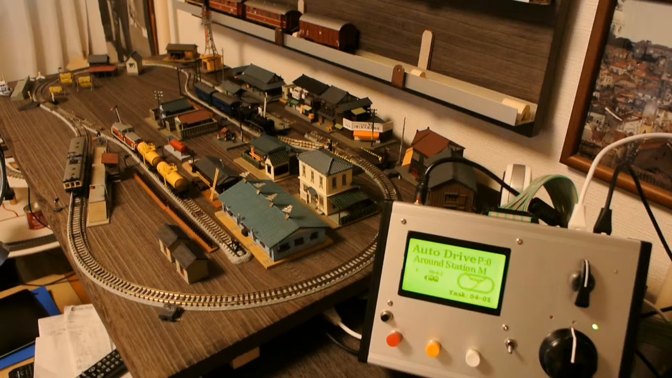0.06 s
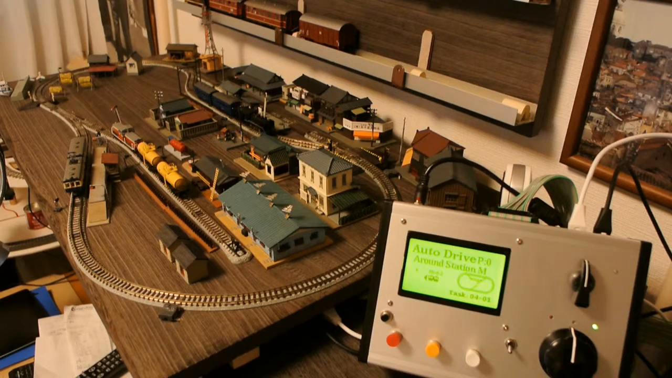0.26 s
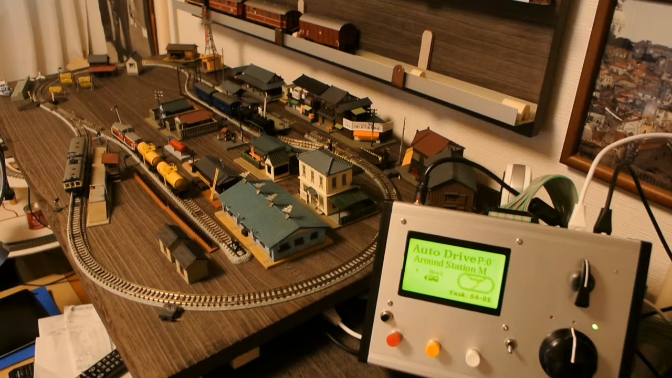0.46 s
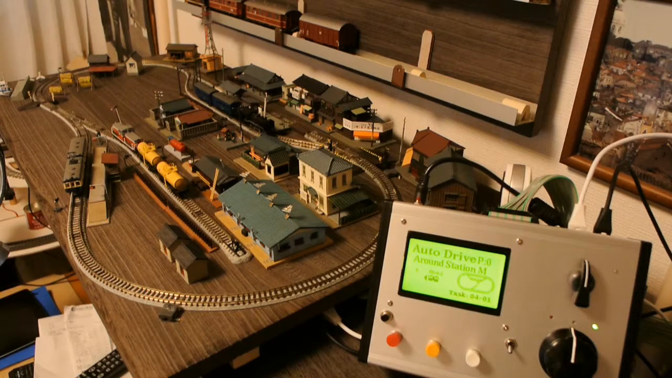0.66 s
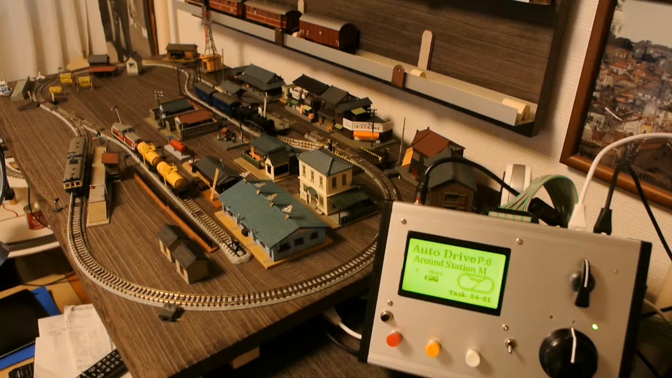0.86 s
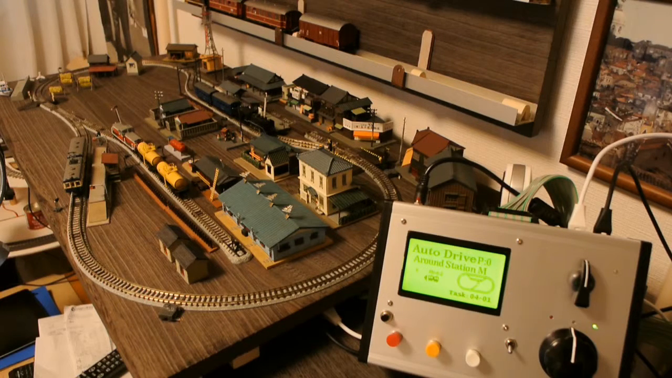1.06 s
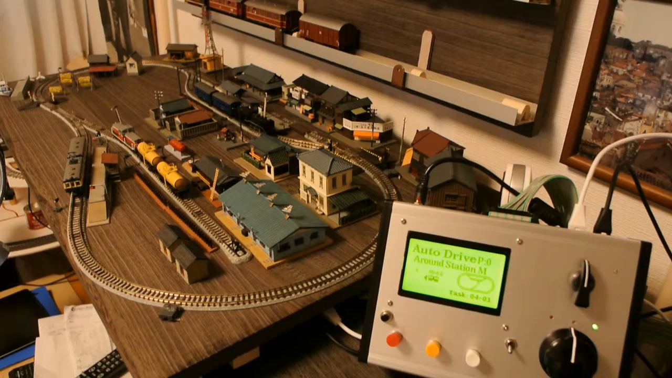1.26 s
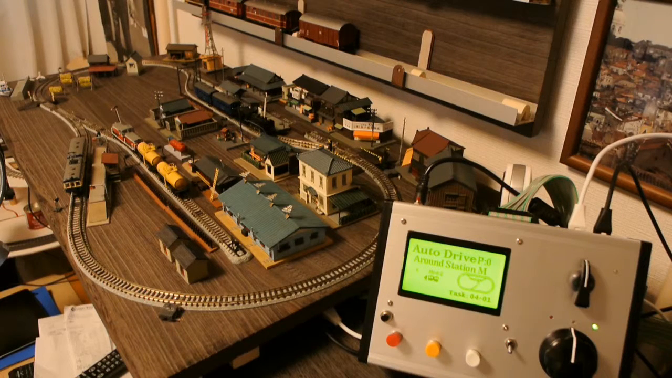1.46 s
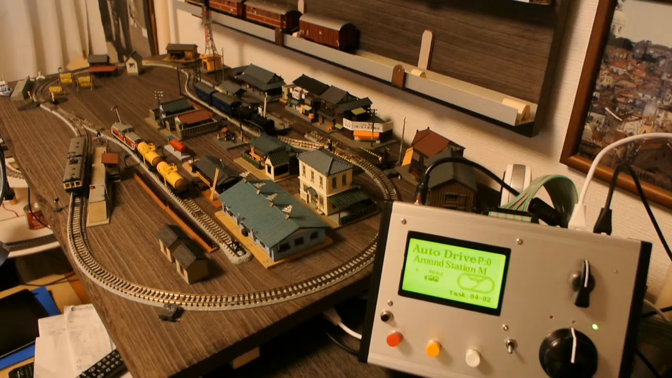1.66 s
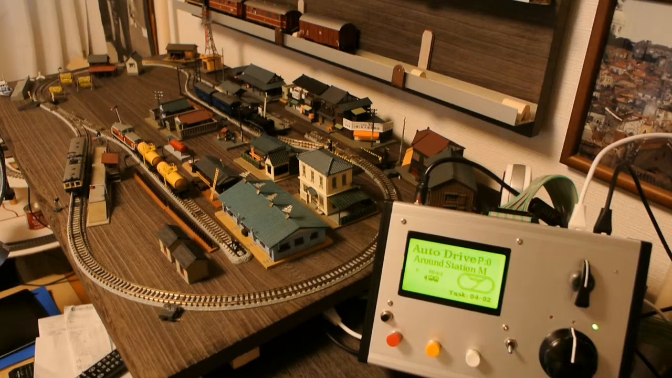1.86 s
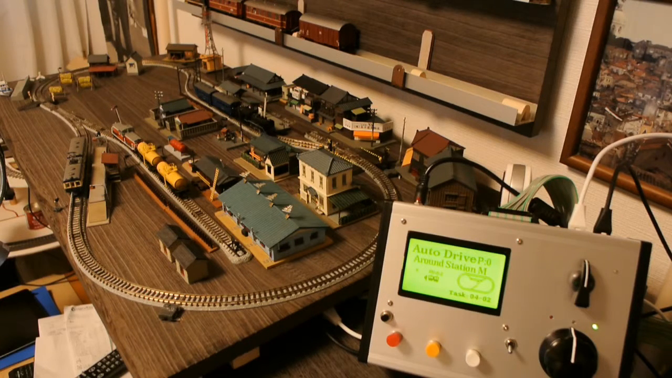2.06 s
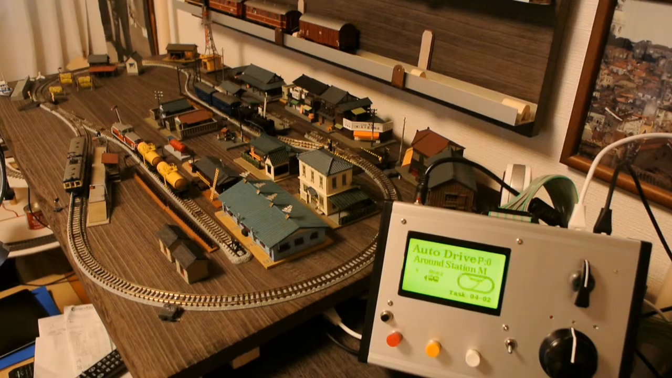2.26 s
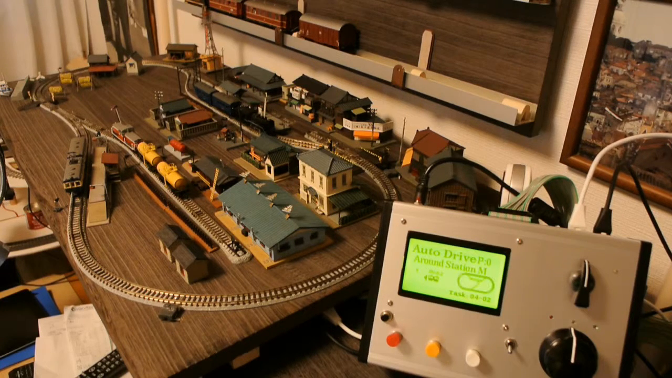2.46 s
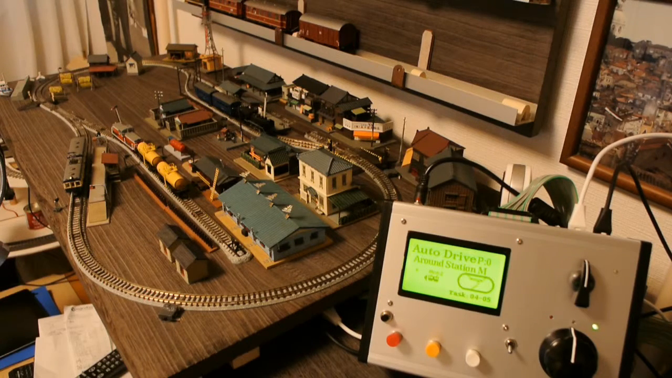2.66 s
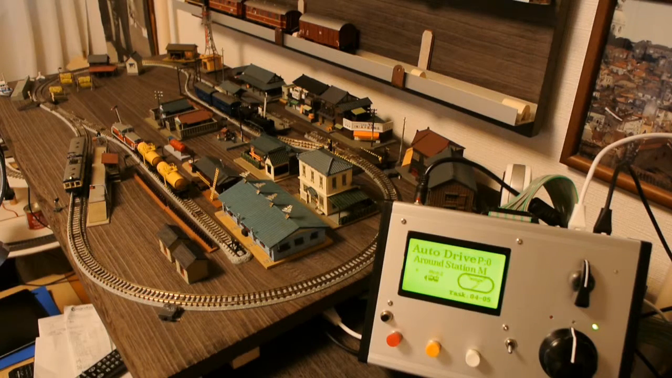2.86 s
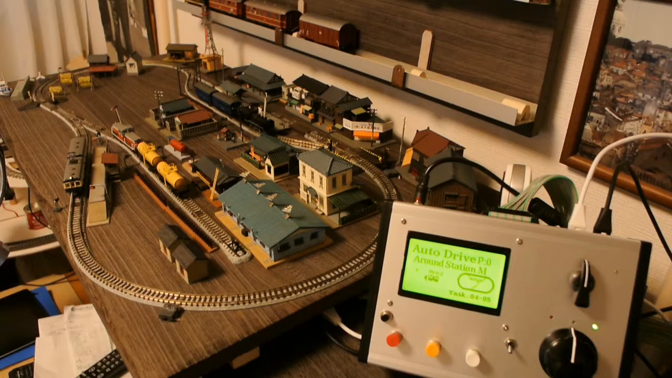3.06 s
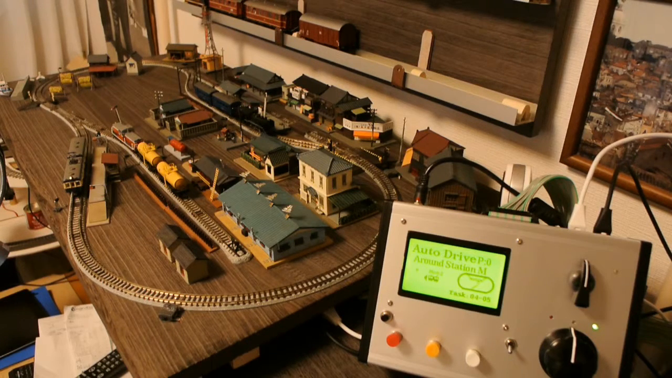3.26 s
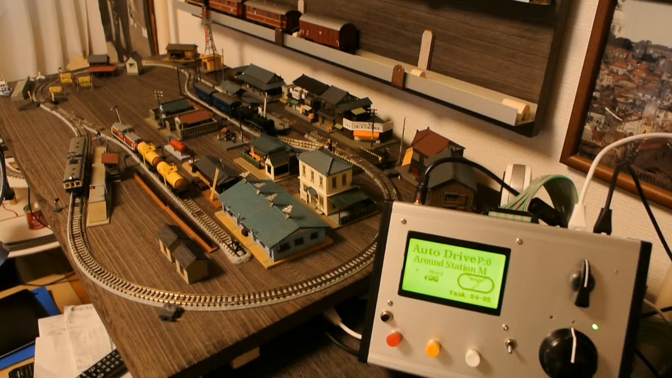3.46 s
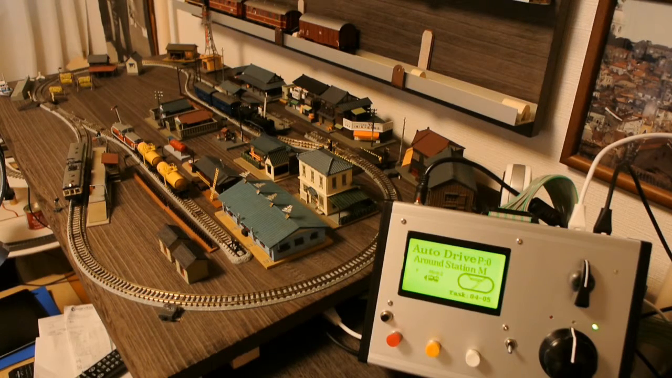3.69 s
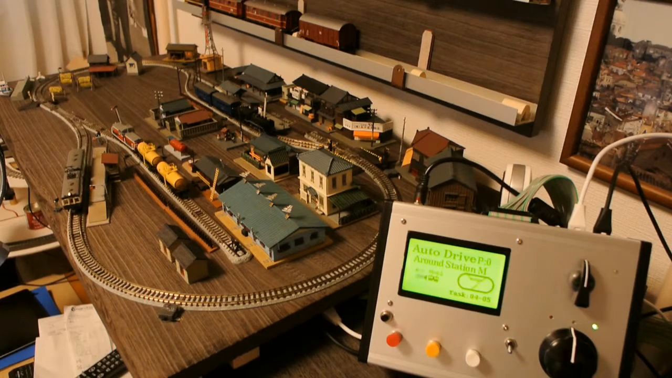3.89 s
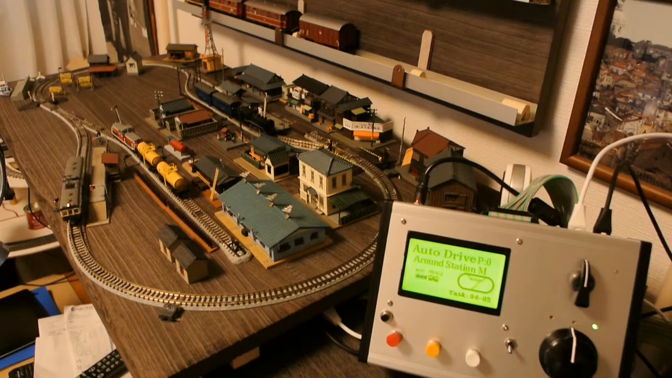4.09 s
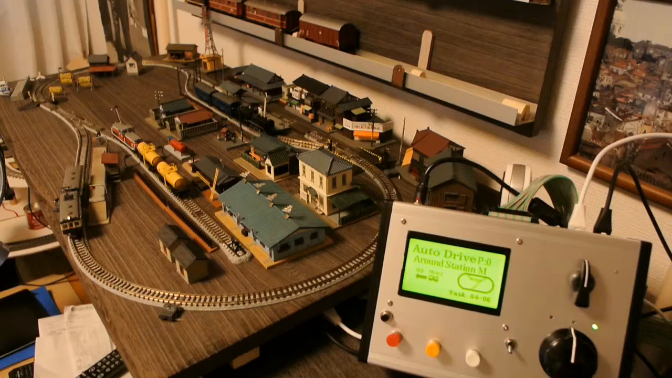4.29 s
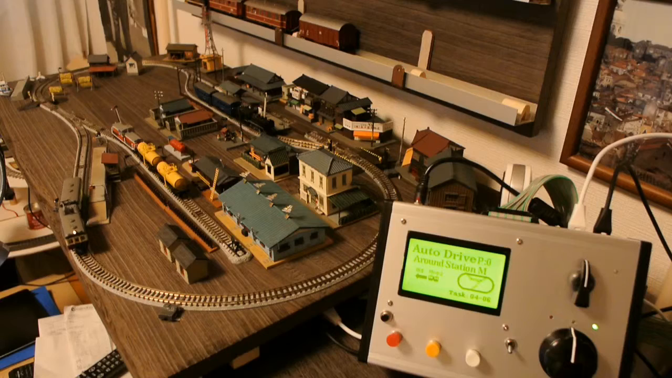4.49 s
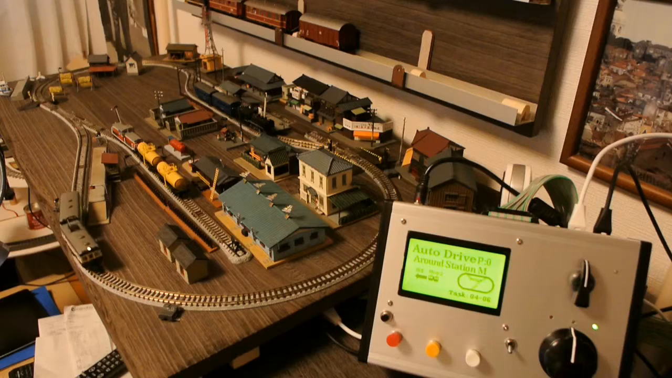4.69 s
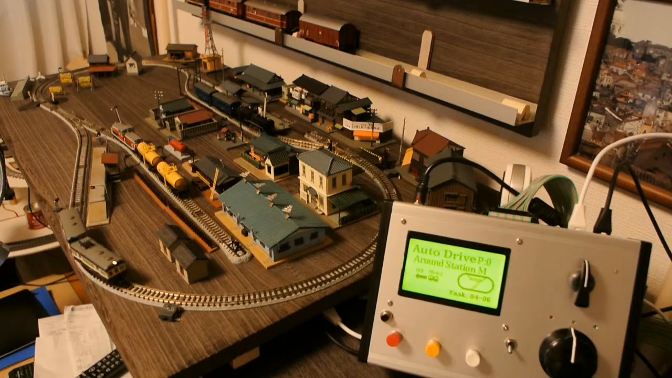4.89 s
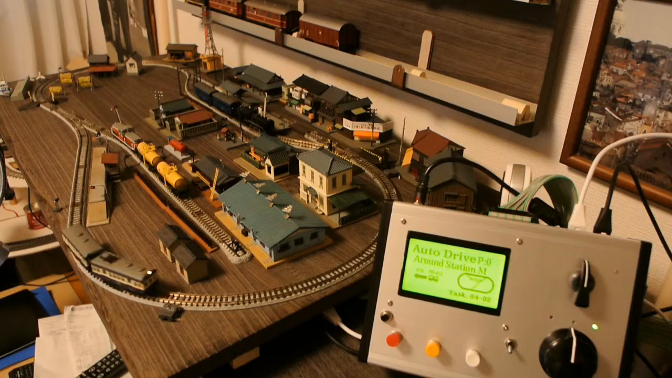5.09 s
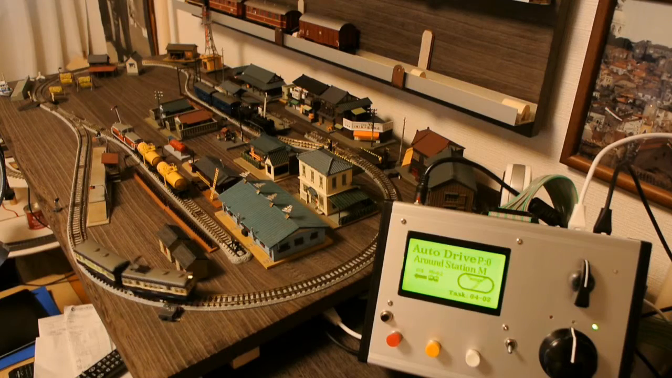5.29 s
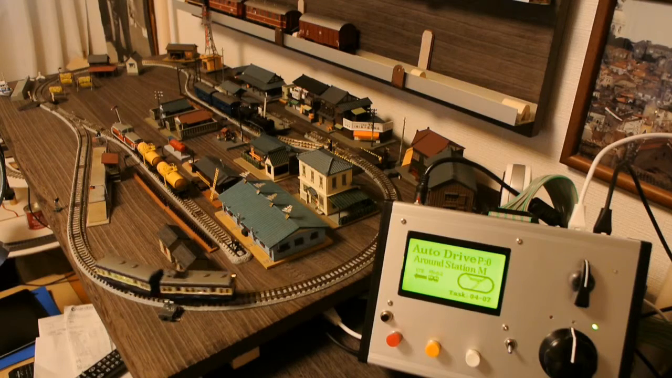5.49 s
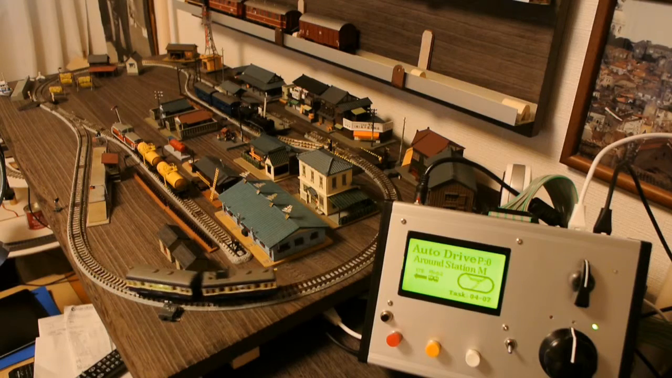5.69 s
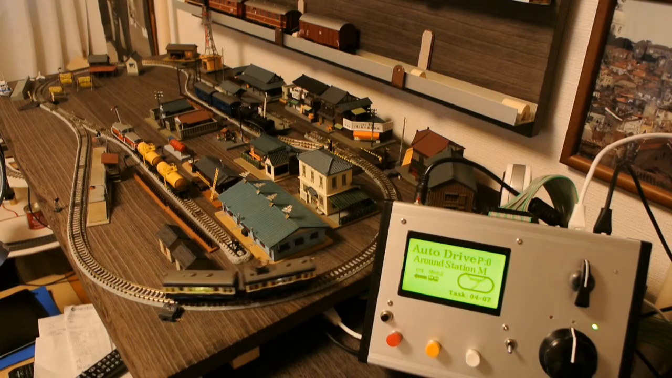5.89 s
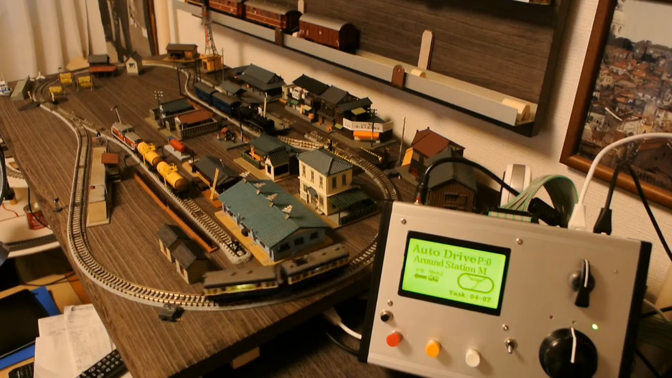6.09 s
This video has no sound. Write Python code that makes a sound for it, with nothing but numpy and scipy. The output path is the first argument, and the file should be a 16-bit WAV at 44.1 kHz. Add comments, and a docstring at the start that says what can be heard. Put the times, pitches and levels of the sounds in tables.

```python
"""A small, quiet room with a model railway on a wooden table.
Three solenoid point switches snap over half a second apart; each impact excites the baseboard's modes.
Then a two-car electric train pulls away and rounds the near curve. Its drive whirrs, its wheels hiss
and click over the rail joints, and all of this passes through the resonances of car bodies and track.
Beneath lie a steady hiss and a few faint knocks."""
import sys
import numpy as np
from scipy import signal
from scipy.fft import rfft, irfft
from scipy.io import wavfile

SR = 44100
rng = np.random.default_rng(int(sys.argv[2]) if len(sys.argv) > 2 else 0)


def unload_audio(sound):
    """Save the sound as a 16-bit wav file, at the path given as the first command line argument."""
    columns = np.transpose(np.atleast_2d(sound))
    # keep every value between -1 and 1, then stretch to whole-number steps
    steps = np.round(np.clip(columns, -1, 1) * 32767)
    wavfile.write(sys.argv[1], SR, steps.astype(np.int16))


N = 270774

DEPART_S, SPEED_UP_S = 3.531, 1.21
BITE_S, BITE_WIDTH_S, BITE_DB = 4.77, 0.15, 2  # the flanges bite on entering the curve
def train():
    """Source and filter: contact noise grows as a power of speed and excites the cars and track."""
    t = np.arange(N) / SR
    speed = np.clip((t - DEPART_S) / SPEED_UP_S, 0, 1)
    bite = from_db(BITE_DB * np.exp(-((t - BITE_S) / BITE_WIDTH_S) ** 2))
    rail_force = speed ** 1.17 * bite
    contact = drive_whirr(speed) + wheel_hiss(rail_force) + clicks(rail_force)
    balance = from_db([[0.28], [-0.28]])  # slightly to the left
    return room(body_resonances(contact, t), wet_db=-9) * balance


# Spectrum of motor and gears: f/Hz, relative level/dB
DRIVE_SPECTRUM = [(60, -39), (140, -31), (200, -10), (350, -13), (540, -12), (680, -6), (1000, -5),
                  (1400, 0), (1800, 0), (2300, -2.5), (3500, -5), (8000, -14.5), (16000, -46)]
def drive_whirr(speed):
    """Gear noise: its amplitude grows roughly as the square root of speed."""
    force = from_db(-40) * speed ** 0.52 * contact_noise(grain_db=0, sway_db=0.5)
    return colour(force, DRIVE_SPECTRUM)


# Spectrum of wheels on rails: f/Hz, relative level/dB
WHEEL_SPECTRUM = [(200, -39), (1200, -15), (2500, -6.5), (3900, -4), (5000, -0.5), (6400, 2.5), (8000, 0.5),
                  (10000, -3), (13000, -5.5), (16000, -8)]
def wheel_hiss(rail_force):
    """Rolling noise: its amplitude is proportional to the force on the rail."""
    force = from_db(-32.5) * rail_force * contact_noise(grain_db=1, sway_db=0.5)
    return colour(force, WHEEL_SPECTRUM)


# Spectrum of a click: f/Hz, relative level/dB
CLICK_SPECTRUM = [(150, -24), (700, -11.5), (1600, -1.5), (2500, -3), (3500, -3.5), (5500, 2.5), (7500, 1),
                  (10000, 0.5), (16000, -2)]
def clicks(rail_force, size=16384):
    """Impact noise: jolts from joints and loose parts each release a broadband burst."""
    jolts = joint_jolts() + from_db(-25) * rail_force * rattle(per_s=55, t60=0.012)
    add(jolts, DEPART_S, from_db(-32) * blow(size, t60=0.27, rise=0.0013))  # the couplings jerk
    return colour(jolts * contact_noise(grain_db=1.5, sway_db=0), CLICK_SPECTRUM)


# Rail joint crossings: t/s, level/dB, wheel-to-wheel interval/s, number of wheels
JOINT_CROSSINGS = [(3.572, -35.5, 0, 1), (3.709, -29, 0.019, 2), (3.857, -25, 0, 1), (4.019, -39, 0, 1),
                   (4.069, -24.5, 0.014, 2), (4.173, -25, .0155, 2), (4.281, -24.5, 0, 1),
                   (4.376, -22, 0.013, 2), (4.545, -22.5, 0.038, 4), (4.706, -21.5, .035, 4),
                   (4.941, -22.5, 0.074, 4), (5.450, -25, 0, 1), (5.581, -21.5, 0.078, 4),
                   (5.967, -23.5, 0.079, 4)]
def joint_jolts(size=8192):
    """Impulsive excitation: each wheel in turn drops into the joint, and its chatter dies away."""
    force = np.zeros(N)
    for start, level_db, gap, wheels in JOINT_CROSSINGS:
        for k in range(round(wheels)):
            add(force, start + k * gap, from_db(level_db) * blow(size, t60=0.07, rise=0.0007))
    return force


def rattle(per_s, t60):
    """Poisson process: loose couplings and bogies give decaying jolts of uneven height."""
    ticks = (rng.random(N) < per_s / SR) * rng.random(N)
    decay = from_db(-60 / (t60 * SR))
    return signal.lfilter([1], [1, -decay], ticks + 1e-18)


# Passage from the straight into the curve: t/s, share of curve (0-1)
CURVE_SHARE = [(4.4, 0), (4.7, 0.63), (5.3, 1), (5.8, 0.8)]
# Modes of car bodies and track bed: f/Hz, bandwidth/Hz, gain on straight/dB, gain in curve/dB
BODY_MODES = [(356, 22, -7, 4), (690, 72, -21, -22), (920, 150, -27, -1.5), (1196, 39, -5, -4.5),
              (1413, 74, -3, -33), (1460, 12, -12, -15), (1644, 38, -1.5, -1.5), (1727, 39, 1, 0),
              (1986, 21, -20, 3), (3110, 130, -3.5, -2.5), (4400, 630, -24, -10), (5180, 310, -0.5, -24),
              (6470, 33, -15, 2), (12800, 700, -28, -9)]
def body_resonances(contact, t):
    """Forced vibration: other modes take over in the curve, where flanges press on the outer rail."""
    bend = np.interp(t, *np.transpose(CURVE_SHARE))
    sound = contact
    for hz, width, straight_db, curve_db in BODY_MODES:
        gain = (1 - bend) * from_db(straight_db) + bend * from_db(curve_db)
        sound = sound + gain * resonance(contact, hz, width)
    return sound


def contact_noise(grain_db, sway_db):
    """Amplitude modulation: tiny impacts roughen a noise whose force sways as the wheels turn."""
    grains = rms_one(from_db(grain_db * flutter(per_s=1500)))
    return stereo_noise(LAYOUT_COHERENCE) * grains * from_db(sway_db * flutter(per_s=90))


# Throws of the point switches: t/s, snap level/dB, snap T60/s
SWITCH_THROWS = [(1.138, -18, 0.041), (1.6375, -19.5, 0.068), (2.1375, -15.5, 0.024)]
# Spectra of the plungers: f/Hz, relative level/dB for switch 1, 2, 3
SNAP_SPECTRA = [(100, -27, -18, -23), (280, -13, -9, -12), (597, -2, 5, 0), (895, 4, -1.5, -8),
                (1400, -2, -1, -1), (2180, -8, -3.5, -7.5), (2700, -3.5, 1, 9), (3570, -2, 1, -3.5),
                (4360, 2, -3, -0.5), (7040, -5.5, 3, 0), (8700, 0.5, 0.5, -2), (11500, -1.5, 0.5, 2.5),
                (14500, -2, 2, -2), (16000, -6, -5, -7)]
def switches(size=16384, slide_s=0.003):
    """Impact excitation: each solenoid plunger slides, slams home and sets the board ringing."""
    out = np.zeros((2, N))
    for k, (start, level_db, snap_t60) in enumerate(SWITCH_THROWS):
        force = from_db(-15.5) * blow(size, t60=0.037, rise=0.0033)  # slide
        add(force, slide_s, blow(size, snap_t60, rise=0.00039))  # slam
        spectrum = np.array(SNAP_SPECTRA)[:, [0, k + 1]]
        snap = colour(force * stereo_noise(LAYOUT_COHERENCE, size), spectrum)
        add(out, start - slide_s, from_db(level_db) * room(snap, wet_db=-5.5))
        add(out, start, baseboard(k, size))
    return out


# Modes of baseboard and switch housings: f/Hz, T60/s, level/dB for switch 1, 2, 3
BASEBOARD_MODES = [(306, 0.11, -69, -55, -43), (440, 0.16, -52, -35, -34), (480, 0.16, -47, -26.5, -29),
                   (733, .12, -38, -35, -39), (800, 0.2, -38.5, -43, -37), (874, 0.15, -40, -36.5, -60),
                   (1020, 0.21, -41, -57, -47), (1233, 0.33, -51, -46, -57), (1440, 0.078, -36, -27.5, -30),
                   (1474, 0.1, -32.5, -32, -33), (2754, 0.065, -33, -32, -37.5),
                   (3190, 0.16, -40, -48, -48), (4120, 0.1, -34, -54, -39), (4890, 0.086, -50, -36, -37),
                   (7230, 0.072, -57, -30, -45), (9930, 0.038, -44, -21, -22),
                   (10750, 0.038, -28, -50, -45)]
def baseboard(switch, size):
    """Modal superposition: damped sinusoids whose strengths depend on where the switch sits."""
    age = np.arange(size) / SR
    ring = np.zeros(size)
    for hz, t60, *levels_db in BASEBOARD_MODES:
        swing = np.sin(2 * np.pi * (hz * age + rng.random()))
        ring += from_db(levels_db[switch]) * swing * blow(size, t60, rise=0.0026)
    return ring


# Left-right coherence of the layout's sounds, the room's tail and the knocks: f/Hz, correlation
LAYOUT_COHERENCE = [(100, 0.61), (900, 0.83), (1900, 0.76), (3200, 0.54), (5200, 0.4), (7500, -0.016),
                    (10000, -0.13), (15000, -0.39)]
def room(x, wet_db, size=12288):
    """Reverberation: the near wall and the furniture return a short, dense tail."""
    tail = stereo_noise(LAYOUT_COHERENCE, size) * blow(size, t60=0.24, rise=0.0051)
    tail /= np.sqrt(np.sum(tail ** 2) / 2)
    return x + from_db(wet_db) * signal.fftconvolve(x, tail, axes=1)[:, :x.shape[1]]


# Faint knocks in the room: t/s, level/dB, centre f/Hz, T60/s
ROOM_KNOCKS = [(.44, -47.5, 1300, 0.1), (.468, -46, 1700, 0.093), (.968, -52, 846, 0.26),
               (0.999, -50, 1710, .15), (2.649, -60, 149, 0.76)]
def knocks(size=16384):
    """Damped transients: each knock is a band of noise that decays exponentially."""
    out = np.zeros((2, N))
    for start, level_db, hz, t60 in ROOM_KNOCKS:
        thud = rms_one(resonance(stereo_noise(LAYOUT_COHERENCE, size), hz, width_hz=0.55 * hz))
        add(out, start, from_db(level_db) * thud * blow(size, t60, rise=0.0019))
    return out


# Spectrum of the background hiss: f/Hz, relative level/dB
HISS_SPECTRUM = [(15, -38), (25, -6), (45, -6.5), (85, -3), (130, -1), (220, -5), (300, -0.5), (450, 0),
                 (800, -1.5), (1500, -2.5), (6000, -2.5), (12000, -3), (16000, -4.5)]
# Its left-right coherence: f/Hz, correlation
HISS_COHERENCE = [(50, 0.81), (400, 0.42), (1000, 0.18), (2500, 0), (15000, 0.0083)]
def still_air():
    """Stationary noise: a faint hiss, alike on both sides in the bass and diffuse in the treble."""
    return from_db(-47) * colour(stereo_noise(HISS_COHERENCE), HISS_SPECTRUM)


def from_db(db):
    """Decibels to amplitude ratio."""
    return 10 ** (np.asarray(db) / 20)


def rms_one(x):
    """Normalisation to unit power."""
    return x / np.sqrt(np.mean(x ** 2) + 1e-20)


def at_hz(points, size):
    """Interpolation of a table over log frequency at the bins of a transform."""
    hz, value = np.transpose(points)
    bin_hz = np.arange(size // 2 + 1) * SR / size
    return np.interp(np.log(bin_hz + 1), np.log(hz), value)


def stereo_noise(coherence, size=N):
    """Partial coherence: mid and side white noises mix to the given left-right correlation."""
    alike = np.clip(at_hz(coherence, size), -1, 1)
    mid, side = rfft(rng.standard_normal((2, size)))
    return rms_one(irfft(np.sqrt(1 + alike) * mid + np.sqrt(1 - alike) * side * [[1], [-1]], size))


def colour(x, spectrum, size=8192):
    """Minimum-phase filtering to this spectrum; white noise keeps its power."""
    magnitude = rms_one(from_db(at_hz(spectrum, size)))
    cepstrum = irfft(np.log(magnitude))
    cepstrum[1:size // 2] *= 2  # folding makes the response causal
    cepstrum[size // 2 + 1:] = 0
    response = irfft(np.exp(rfft(cepstrum)))
    return signal.fftconvolve(x, response[None], axes=1)[:, :x.shape[1]]


def blow(size, t60, rise):
    """Impact envelope: quick rise, exponential decay, both times in seconds."""
    age = np.arange(size) / SR
    return (1 - np.exp(-age / rise)) * np.exp(-np.log(1000) * age / t60)


def resonance(x, hz, width_hz):
    """Damped resonator: a two-pole band-pass with unit peak gain."""
    r = np.exp(-np.pi * width_hz / SR)
    feedback = [1, -2 * r * np.cos(2 * np.pi * hz / SR), r * r]
    return signal.lfilter(np.array([1, 0, -1]) * (1 - r * r) / 2, feedback, x + 1e-18)


def flutter(per_s):
    """Smooth random fluctuation of unit power."""
    return rms_one(np.interp(np.arange(N) / SR * per_s, np.arange(N), rng.standard_normal(N)))


def add(track, start, sound):
    """Superposition of a sound on a track, from start in seconds."""
    part = track[..., int(start * SR):][..., :sound.shape[-1]]
    part += sound[..., :part.shape[-1]]


def scene():
    """Linear superposition of the layout's sounds and the room's background."""
    return switches() + train() + still_air() + knocks()


def record(dry, cutoff_hz=15950):
    """Elliptic low-pass filtering cuts the highest treble steeply."""
    return signal.sosfilt(signal.ellip(12, .1, 80, cutoff_hz, fs=SR, output="sos"), dry)


dry = scene()
out = record(dry)
unload_audio(out)
```